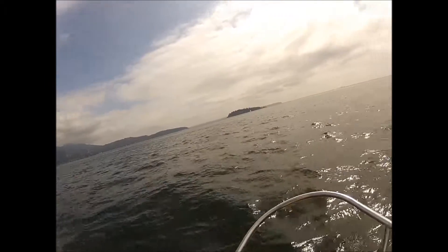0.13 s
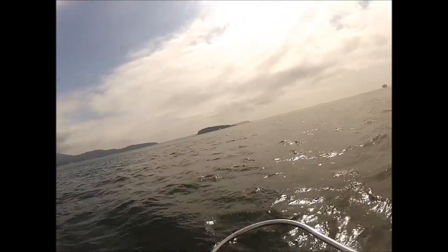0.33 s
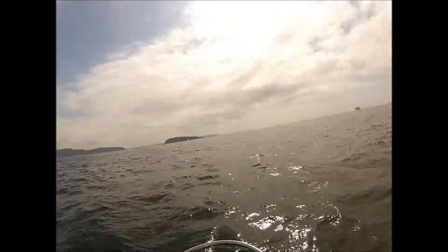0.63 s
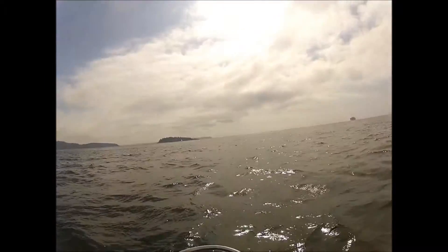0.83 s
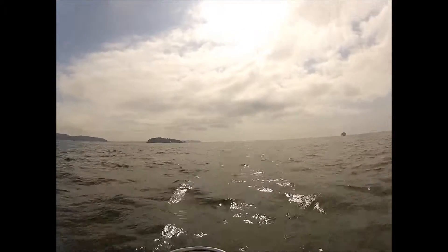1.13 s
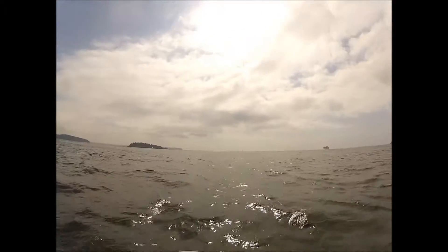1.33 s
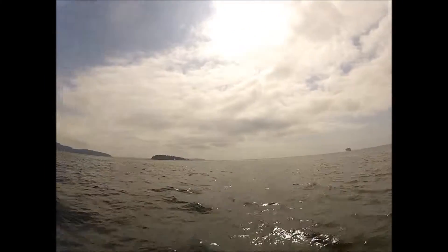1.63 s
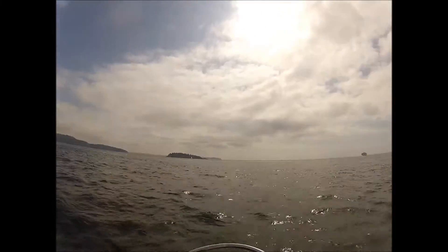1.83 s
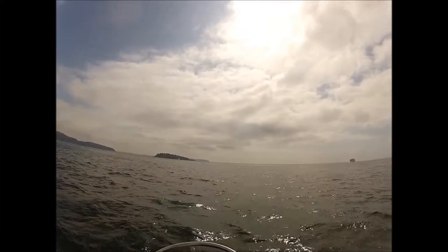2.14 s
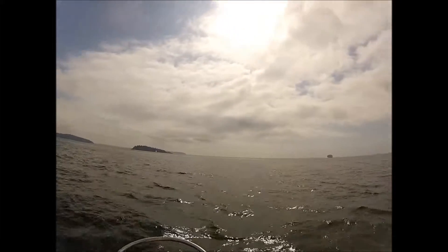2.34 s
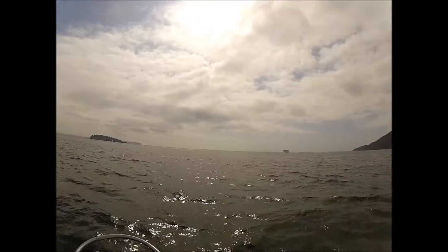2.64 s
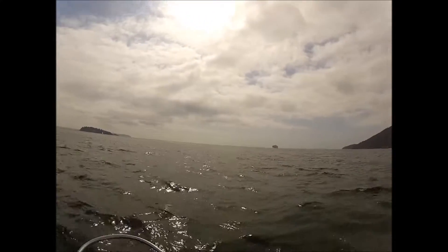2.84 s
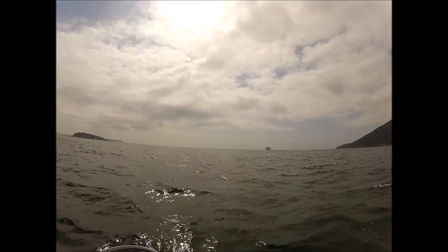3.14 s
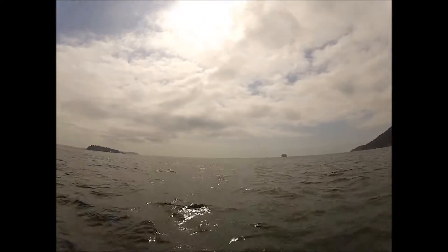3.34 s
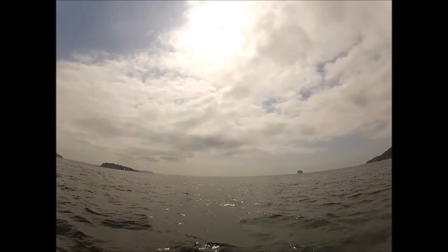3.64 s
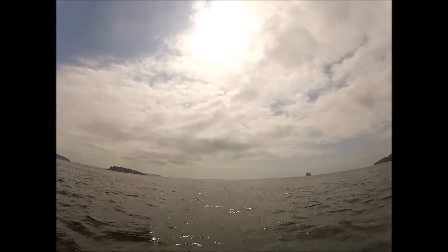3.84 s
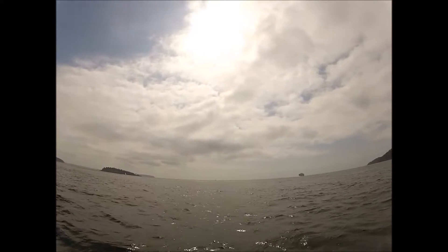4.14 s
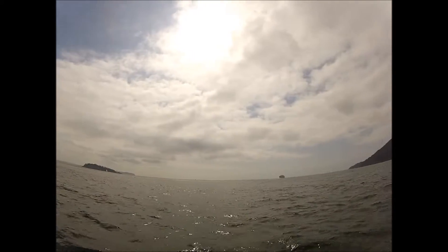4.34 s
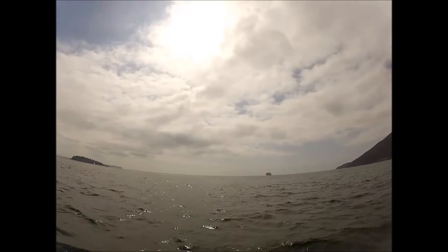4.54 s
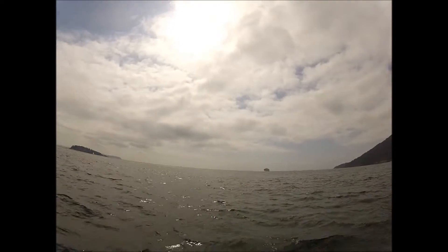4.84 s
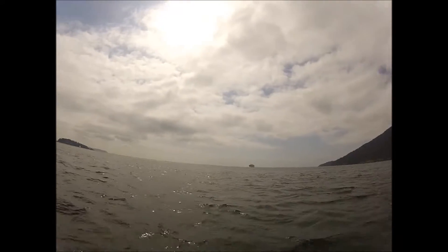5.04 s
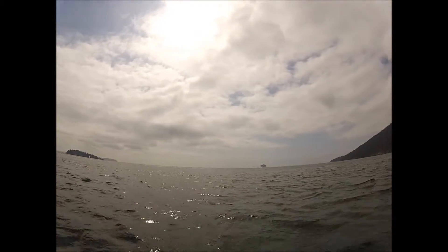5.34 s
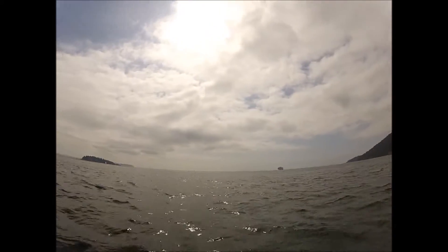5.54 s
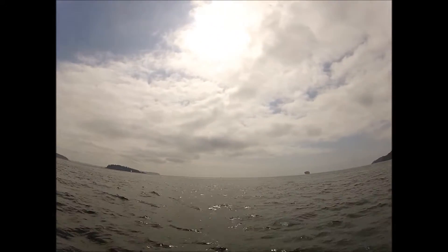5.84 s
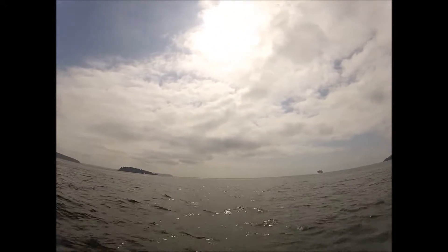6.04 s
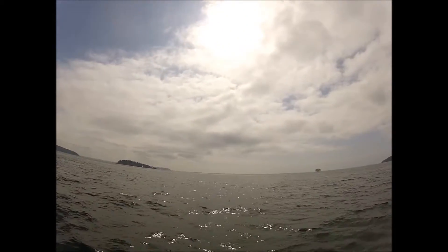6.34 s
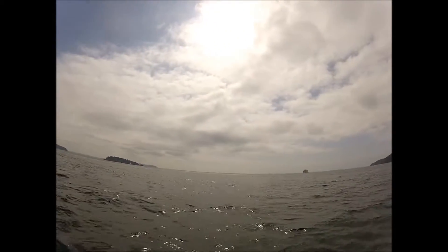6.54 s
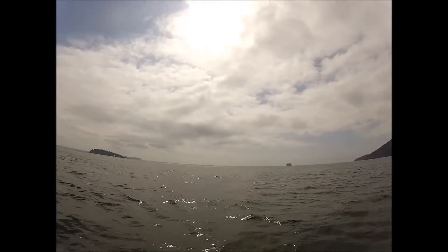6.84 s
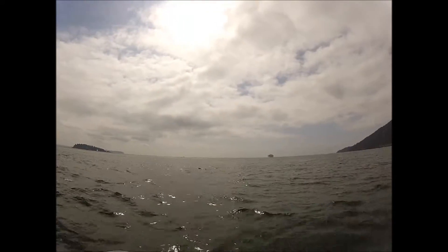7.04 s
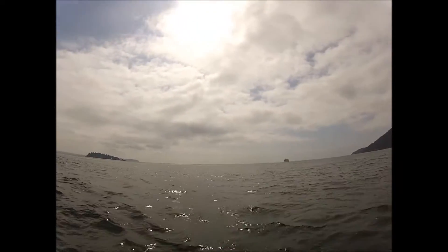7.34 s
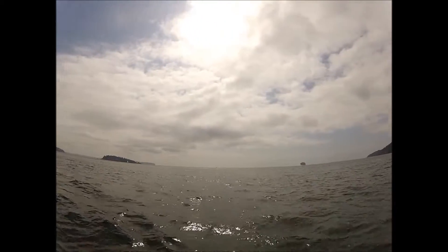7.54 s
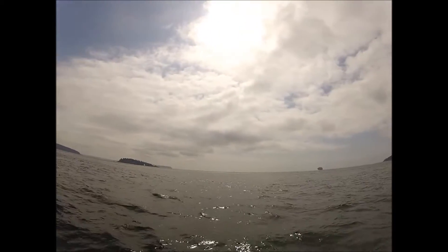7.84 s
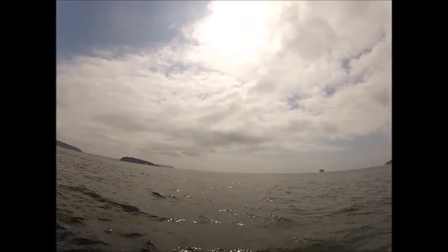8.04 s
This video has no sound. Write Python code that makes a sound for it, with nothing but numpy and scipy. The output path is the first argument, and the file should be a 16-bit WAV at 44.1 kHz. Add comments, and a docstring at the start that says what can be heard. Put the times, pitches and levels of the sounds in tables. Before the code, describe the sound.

Hard plastic knocks and rattles crowd the first seconds, then water laps and slaps against a rolling boat above a soft low rumble.

```python
"""Camera housing on a rolling sailing boat

Waves wash and fizz along the hull: shaped noise with bubbles, coloured by the housing of a camera.
Beneath lies a lumpy rumble of wind and hull: low noise with random jolts of the camera's mount.
The mount slips and knocks, ringing the plastic housing as a sum of damped modes; soft bumps lack the click.
A small metal fitting is struck once: a few touches and a scrape, with longer ringing modes."""
import sys
import numpy as np
from scipy import signal
from scipy.io import wavfile
from scipy.ndimage import uniform_filter1d

SR = 44100
rng = np.random.default_rng(int(sys.argv[2]) if len(sys.argv) > 2 else 0)


def pcm_store(signal):
    """Save signal as 16-bit PCM."""
    levels = np.round(np.clip(np.atleast_2d(signal), -1, 1) * 32767)
    wavfile.write(sys.argv[1], SR, levels.astype(np.int16).T)


N = 361179

# camera swinging on its mount: (frequency [Hz], relative level [dB], t60 [s], signed weight [-])
MOUNT_MODES = [(100, 2.5, 0.052, 0.92), (220.4, 3.5, 0.023, -0.9), (370, -8, 0.0093, -0.5)]


def gain_of(db):
    """Level to amplitude: 20 dB is a factor of ten."""
    return 10 ** (np.asarray(db) / 20)


def evened(x):
    """Normalization by effective value: the result has rms 1."""
    return x / np.sqrt(np.mean(x ** 2) + 1e-20)


def add(mix, s, sound):
    """Linear superposition: adds a sound into the mix, in place, from s seconds on."""
    part = mix[round(s * SR):][:len(sound)]
    part += sound[:len(part)]


def curve(rows):
    """Linear interpolation of (time [s], value) rows, sample by sample."""
    return np.interp(np.arange(N) / SR, *np.transpose(rows))


def ring(hz, db, t60, seconds=.1):
    """Free vibration of a struck mode: a sine whose level falls 60 dB in t60 seconds."""
    t = np.arange(int(seconds * SR)) / SR
    return gain_of(db - 60 * t / t60) * np.sin(2 * np.pi * hz * t)


def noise(tone, size, patchy_db, flicker_db, patch_frames, patch_bins):
    """Spectral synthesis: random short-time spectra with drifting patches and a flicker shared by all bins."""
    # air sound through the housing walls: (centre [Hz], width [Hz], lift, or dip if negative [dB])
    through_walls = [(1071, 98, 9), (1510.4, 60, 12), (2164, 570, 7), (2723, 94, 5), (3477, 90, 10),
                     (5150, 300, 2), (6750, 490, 5.5), (8800, 260, -1.5)]
    frames, hz = 4 * N // size + 5, np.fft.rfftfreq(size, 1 / SR)
    real, imaginary, patches = rng.standard_normal((frames, len(hz), 3)).T
    patches = uniform_filter1d(patches, patch_bins, 0)
    patches = evened(uniform_filter1d(patches, patch_frames, 1))
    flicker = evened(uniform_filter1d(rng.standard_normal(frames), patch_frames))
    tone_hz, tone_db = np.transpose(tone)
    db = np.interp(np.log(hz + 1), np.log(tone_hz + 1), tone_db)
    for centre, width, lift in through_walls:
        db = db + lift / (1 + (2 * (hz - centre) / width) ** 2)
    level_db = db[:, None] + patchy_db * patches + flicker_db * flicker
    spectra = (real + 1j * imaginary) * gain_of(level_db)
    return evened(signal.istft(spectra, nperseg=size, noverlap=3 * size // 4)[1][:N])


def random_impulses(per_s, spread_db, most):
    """Poisson-like process: impulses at random moments, with exponentially spread levels up to a limit."""
    size = gain_of(spread_db * np.minimum(rng.exponential(1, N), most))
    return size * (rng.random(N) < per_s / SR)


def bubbles(per_s, spread_db):
    """Bubble resonance: many short damped tones of rising pitch, a few of them large."""
    impulses = random_impulses(per_s, spread_db, most=5)
    pitches = np.geomspace(650, 3800, num=16)
    kind = rng.integers(0, len(pitches), N)
    t, out = np.arange(800) / SR, np.zeros(N)
    for k, hz in enumerate(pitches):
        age = t * hz / 7.9  # reaches 1 after about eight cycles
        bubble = age * np.exp(-4 * age) * np.sin(2 * np.pi * hz * t * (1 + 0.11 * age))
        out += signal.oaconvolve(impulses * (kind == k), bubble)[:N]
    return evened(out)


def water():
    """Turbulent flow noise: wash with bubbles, fine spray, sudden slaps and drips, entering by the port."""
    # waves along the hull: (time [s], wash level before laps and slaps [dB])
    waves = [(0.0, -58), (0.24, -64.5), (0.78, -65.5), (0.95, -52.5), (1.42, -58), (2.05, -56),
             (2.28, -61.5), (2.62, -61), (2.76, -54), (2.89, -57), (3.3, -51.5), (3.5, -47), (3.73, -58.5),
             (4.16, -64), (4.5, -66.5), (4.7, -56), (5.08, -60.5), (5.28, -52), (5.46, -53.5), (5.63, -59),
             (6.0, -62.5), (6.62, -64.5), (7.28, -53), (7.41, -53.5), (7.76, -61), (8.04, -68.5),
             (8.19, -63)]
    # small wavelets lapping on top of the waves: (crest time [s], lift [dB], length [s])
    laps = [(.13, 1, 0.13), (.37, 4.5, 0.21), (0.558, 6, 0.23), (0.698, 8.5, 0.17), (1.165, 6.5, 0.11),
            (1.335, 5, 0.11), (1.595, 2.5, .2), (2.53, 3.5, .14), (4.309, 4.5, 0.32), (4.996, 5, .11),
            (5.803, 2.5, 0.25), (6.884, 1, 0.12)]
    # slaps of water that lift wash and spray at once: (time [s], lift [dB], fade time constant [s])
    slaps = [(.345, 5, 0.054), (2.643, 11, 0.03), (2.745, 4.5, 0.048), (3.136, 5, 0.035), (4.875, 6, 0.04),
             (4.975, 3, 0.043), (5.2, 2.5, 0.076), (7.075, 2.5, 0.059)]
    # spectra of wash and spray: (frequency [Hz], relative density [dB per Hz])
    wash_tone = [(150, -16), (250, 1.5), (509, -4), (1440, -8), (1620, -7.5), (2780, -9), (4700, -18.5),
                 (5220, -15.5), (5800, -24.5), (7540, -58), (12800, -120)]
    spray_tone = [(1500, -26), (2800, -5), (5000, -4.5), (7000, -6.5), (9300, -2.5), (10500, -5),
                  (11800, -15.5), (13000, -11), (14600, -4), (15200, -13), (15450, -57)]
    # single drips: (time [s], level [dB], frequency [Hz], t60 [s])
    drips = [(6.115, -38, 1940, 0.018), (0.32, -41, 2200, 0.011)]
    # band cancelled at the microphone port: (from [Hz], to [Hz])
    port_notch = (5880, 6150)
    calm_db = -62.5  # wave level from which spray and body growth are reckoned
    spray_db_when_calm, spray_growth = -8.5, 1.195  # dB re calm level, dB per dB of wave: faster than the wash
    body_hz, body_db_when_calm, body_growth = 1000, 1.5, .75  # slower growth: big waves are brighter

    wash = noise(wash_tone, size=512, patchy_db=2.0, flicker_db=1.3, patch_frames=9, patch_bins=6)
    wash = gain_of(-0.5) * wash + gain_of(-7) * bubbles(per_s=900, spread_db=3.0)
    spray = noise(spray_tone, size=512, patchy_db=2.0, flicker_db=0.87, patch_frames=4, patch_bins=4)

    wave_db = curve(waves)
    for s, db, length in laps:
        add(wave_db, s - length / 2, db * signal.windows.hann(int(length * SR)))
    slap_db = np.zeros(N)
    for s, db, fade in slaps:
        add(slap_db, s, db * np.exp(-np.arange(SR // 4) / SR / fade))

    growth_db = wave_db - calm_db
    spray_db = calm_db + spray_db_when_calm + spray_growth * growth_db
    body_db = calm_db + body_db_when_calm + body_growth * growth_db
    body = signal.filtfilt(*signal.butter(1, body_hz, fs=SR), wash)
    out = gain_of(wave_db) * (wash - body) + gain_of(body_db) * body + gain_of(spray_db) * spray
    out = out * gain_of(slap_db)
    for s, db, hz, t60 in drips:
        add(out, s, np.convolve(ring(hz, db, t60), signal.windows.hann(12) / 6))
    return signal.sosfilt(signal.butter(2, port_notch, "bandstop", fs=SR, output="sos"), out)


def jostle(per_s, spread_db):
    """Impulse response of the mount: small random jolts of either sign swing the camera."""
    jolts = random_impulses(per_s, spread_db, most=4) * rng.choice([-1., 1.], N)
    swing = sum(weight * ring(hz, db, t60) for hz, db, t60, weight in MOUNT_MODES)
    soft_swing = np.convolve(swing, signal.windows.hann(120))
    return evened(signal.oaconvolve(jolts, soft_swing)[:N])


def rumble():
    """Low-frequency pressure noise from gusts and the hull's pitching, which also jostles the mount."""
    # rumble of wind and hull: (time [s], level [dB])
    swell = [(0.0, -56.5), (0.59, -52.5), (1.12, -53), (1.27, -46), (1.76, -48.5), (2.39, -54.5),
             (2.53, -47), (2.8, -54.5), (3.37, -52.5), (3.72, -48.5), (4.27, -56.5), (4.81, -59.5),
             (5.06, -53.5), (5.34, -57.5), (5.54, -49), (6.32, -58.5), (6.82, -53), (7.51, -52.5),
             (7.85, -58), (8.19, -56)]
    # its spectrum: (frequency [Hz], relative density [dB per Hz])
    rumble_tone = [(8.8, -46), (15, -2), (65, 2.5), (119, -3.5), (166, -7.5), (255, -13.5), (317, -11.5),
                   (395, -19), (500, -19), (650, -25.5), (1100, -120)]
    lumps = noise(rumble_tone, size=2048, patchy_db=3.5, flicker_db=1.5, patch_frames=3, patch_bins=4)
    jolts = jostle(per_s=45, spread_db=4.0)
    return gain_of(curve(swell)) * (gain_of(-0.5) * lumps + gain_of(-5.5) * jolts)


def housing_ring(contact_ms, free, chance):
    """Modal excitation by a force pulse: a longer contact dulls the housing; the part bounces once."""
    # housing: (frequency [Hz], relative level [dB], t60 before damping [s], signed weight at microphone [-])
    housing_modes = [(762, -3, 0.0097, 0.87), (1150, -6.5, 0.02, -0.56), (1457, -7, 0.0055, -0.93),
                     (1657, -18.5, 0.019, 1), (1967, -10.5, 0.033, -0.91), (2260, -24, 0.041, -1.1),
                     (2544, -14.5, 0.022, -0.65), (3100, -4.5, 0.0036, -0.87), (3405, -5, 0.012, 0.97),
                     (3920, -20, 0.013, -0.86), (5490, -27.5, 0.022, 1), (6360, -38.5, 0.025, -2),
                     (7170, -25.5, 0.019, 0.79)]
    panel_hz, panel_loss_db_per_ms = 1970, 14.  # a long contact holds the back panel and mutes its ring
    panel_loss_db = panel_loss_db_per_ms * max(contact_ms - .2, 0)
    body = 0
    for (hz, db, t60, weight), c in zip(housing_modes, chance):
        mode_db = db + 1.4 * c - panel_loss_db * (abs(hz - panel_hz) < 150)
        body = body + weight * ring(hz * (1 + 0.015 * c), mode_db, t60 * free, .04)
    contact_s = max(contact_ms, .06) / 1000
    push = np.sin(np.pi * np.clip(np.arange(1, 60) / SR / contact_s, 0, 1)) ** 2
    body = np.convolve(body, push / push.sum())[:len(body)]
    add(body, .0033, gain_of(-23.5) * body.copy())  # the bounce
    return body


def wall_ring(contact_ms, chance):
    """High-frequency excitation by a sharp touch: thin walls ring and loose parts chatter."""
    # thin-wall treble modes: (frequency [Hz], level re tick [dB], t60 [s])
    wall_modes = [(8030, -31.5, 0.014), (8680, -12.5, 0.0093), (9480, -18, 0.0078), (10040, -22, 0.024),
                  (10960, -13.5, 0.0061), (12650, -15.5, 0.0059), (14100, -21, 0.018), (14900, -18.5, .007)]
    tick_db = 4 - 24. * contact_ms  # over the level of the slip: strongest for the shortest contact
    wall = 0
    for (hz, db, t60), c in zip(wall_modes, chance[::-1]):
        wall = wall + np.sign(c) * ring(hz * (1 + 0.0057 * c), tick_db + db + 0.71 * c, t60, .04)
    t = np.arange(len(wall)) / SR
    wall = wall * (1 - np.exp(-t / 0.00077))  # the walls take a moment to build up
    chatter = gain_of(tick_db - 22.0 - 60 * t / 0.024) * (1 - np.exp(-t / 0.00074))
    chatter = chatter * rng.standard_normal(len(t))
    return wall + signal.lfilter(*signal.butter(2, [3000, 14000], "band", fs=SR), chatter)


def knock(db, way, contact_ms, thump_db, chance):
    """Superposed modes of a slip: housing and walls ring while the camera swings on its mount."""
    free = np.clip(.5 - 0.02 * (thump_db - db), .3, 1.2)  # a heavy swing presses on the housing and damps it
    click = housing_ring(contact_ms, free, chance) + wall_ring(contact_ms, chance)
    out = 0
    for (hz, mode_db, t60, weight), c in zip(MOUNT_MODES, chance):
        out = out + weight * ring(hz * (1 + 0.064 * c), thump_db + mode_db, t60)
    out = np.convolve(out, signal.windows.hann(40) / 20)
    add(out, 0, gain_of(db) * click)
    return np.sign(way) * out


def mount():
    """Stick-slip and soft impact: knocks of the slipping mount and bumps without a click."""
    # slips: (time [s], level [dB], direction [sign], contact time [ms], low thump level [dB])
    slips = [(0.02, -40.5, 1, 0.073, -48.5), (0.1204, -28.5, -1, 0.43, -44), (0.371, -43, -1, 0.08, -44),
             (0.3885, -38, 1, 0.074, -47), (0.504, -25.5, 1, 0.66, -42.5), (0.5372, -24.5, -1, 0.54, -41.5),
             (0.934, -14.5, 1, 0.34, -36), (0.9666, -25, -1, 0.94, -39), (1.0897, -11, 1, 0.17, -29.5),
             (1.106, -16.5, 1, 0.25, -39), (1.12, -16.5, 1, 0.42, -39), (1.1355, -16, 1, 0.35, -47),
             (1.1543, -13, 1, 0.26, -38), (1.1665, -13, 1, 0.28, -37.5), (1.2548, -6.5, 1, 0.07, -32),
             (1.3074, -7, 1, 0.083, -33), (1.335, -9, 1, 0.14, -32.5), (1.6233, -13.5, -1, 0.3, -29),
             (1.7951, -32.5, -1, 0.52, -37), (1.8103, -28.5, -1, 0.76, -34.5), (1.8203, -33, -1, 0.55, -45),
             (2.0244, -6.5, 1, 0.25, -22), (2.0334, -22, 1, 0.69, -33), (2.1986, -29.5, -1, 0.61, -39.5),
             (2.3012, -34.5, -1, 0.65, -49), (2.3968, -28, 1, 0.47, -43), (2.424, -36, 1, 0.63, -47),
             (2.4576, -27.5, 1, 0.25, -37), (2.4693, -30.5, 1, 0.26, -38), (2.4806, -29, 1, 0.4, -38),
             (2.4905, -28, 1, 0.65, -40), (2.498, -29, 1, 0.68, -39), (2.505, -29, 1, 0.75, -40),
             (2.5108, -33, 1, 0.75, -40), (2.5168, -31, 1, 0.75, -41), (2.523, -34.5, 1, 0.7, -42),
             (2.533, -36, 1, 0.75, -43), (2.6005, -35, -1, 0.14, -38), (2.674, -41, -1, 0.36, -38),
             (2.7396, -18, 1, 0.44, -32), (3.043, -29, -1, 0.72, -44.5), (3.3415, -28, -1, 0.4, -41),
             (4.9482, -39, -1, 0.58, -60), (5.384, -20.5, 1, 0.54, -34), (5.5479, -30, 1, 0.51, -36),
             (5.5616, -32, -1, 0.85, -46), (6.021, -41, -1, 0.49, -65), (6.662, -29.5, -1, 0.46, -35),
             (6.6949, -31.5, -1, 0.73, -39), (6.7026, -33, -1, 0.63, -40), (6.7787, -36, -1, 0.54, -61),
             (6.8157, -17.5, -1, 0.28, -28), (7.0155, -14.5, 1, 0.5, -29), (7.0318, -21.5, 1, 0.44, -29),
             (7.0455, -26, 1, 0.62, -33), (7.0656, -38, 1, 0.55, -40), (7.2064, -34.5, 1, 0.36, -45)]
    # soft bumps: (time [s], level [dB], pitch [Hz], decay by 60 dB [cycles])
    soft_bumps = [(0.364, -48, 105, 19), (.413, -38, 100, 8), (1.688, -26.5, 160, 3), (1.702, -34, 130, 5),
                  (1.758, -33.5, 120, 11), (1.884, -35.5, 100, 9), (2.643, -16.5, 172, 1.5),
                  (2.677, -31, 80, 4.5), (3.184, -33.5, 130, 5), (3.213, -23.5, 130, 2),
                  (3.223, -33, 119, 7), (3.249, -34, 140, 2.5), (3.262, -35.5, 260, 11),
                  (4.65, -42, 132, 3), (4.978, -28.5, 85, 3), (5.256, -37.5, 288, 12), (6.068, -36, 100, 1),
                  (7.165, -37, 100, 2.5), (7.268, -34.5, 316, 12.5)]
    out = np.zeros(N)
    for (s, *settings), chance in zip(slips, rng.standard_normal((len(slips), 20))):
        add(out, s, knock(*settings, chance))
    for s, db, hz, cycles in soft_bumps:
        add(out, s, -np.convolve(ring(hz, db, cycles / hz), signal.windows.hann(60) / 30))
    return out


def fitting():
    """Repeated impact and friction: a short rattle of touches and a scrape set the metal ringing."""
    # the strike: (time [s], reference level [dB])
    hit_s, hit_db = (4.316, -42.5)
    # modes of the metal: (frequency [Hz], relative level [dB], t60 [s])
    metal_modes = [(1910, -2.5, .02), (2710, 2, 0.017), (3330, -7, 0.018), (3700, -20, 0.11),
                   (4650, -22, .12), (5600, -9, 0.12), (6379, -10, .11), (7316, -21, .12), (8400, -9, .1),
                   (9200, -4.5, 0.018)]
    bell = sum(ring(*mode, seconds=.2) for mode in metal_modes)
    bell = np.convolve(bell, signal.windows.hann(5) / 2)
    out, t = np.zeros(N), np.arange(900) / SR
    # touches: (delay [s], level re strike [dB])
    for late, db in [(-.0012, -16), (.0012, -4), (.0026, -20), (.004, 1), (.008, -8)]:
        add(out, hit_s + late, gain_of(hit_db + db) * bell)
    scrape = signal.lfilter(*signal.butter(2, [1800, 3600], "band", fs=SR), rng.standard_normal(len(t)))
    swell_and_fade = t / 0.0046 * np.exp(-t / 0.0034)
    add(out, hit_s, gain_of(hit_db + 2.5) * evened(scrape) * swell_and_fade)
    return out


def scene():
    """Superposition of pressures: everything reaches one microphone."""
    return (water() + rumble() + mount() + fitting())[None]


def record(dry):
    """Linear filtering: a dip in the microphone's treble, then the band limit."""
    notched = signal.lfilter(*signal.iirnotch(6020, 6.5, SR), dry)
    dipped = notched + gain_of(-23.5) * dry
    edge_hz = 16500
    low_pass = signal.firwin(511, edge_hz, window=("kaiser", 9), fs=SR)
    return signal.oaconvolve(dipped, low_pass[None], "same")


dry = scene()
out = record(dry)
pcm_store(out)
```